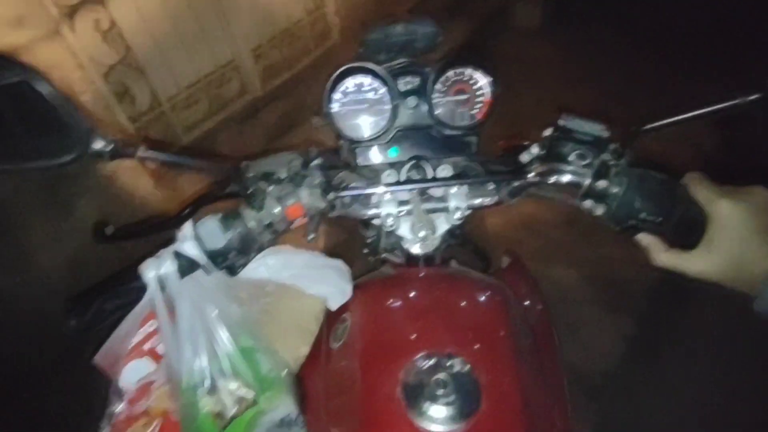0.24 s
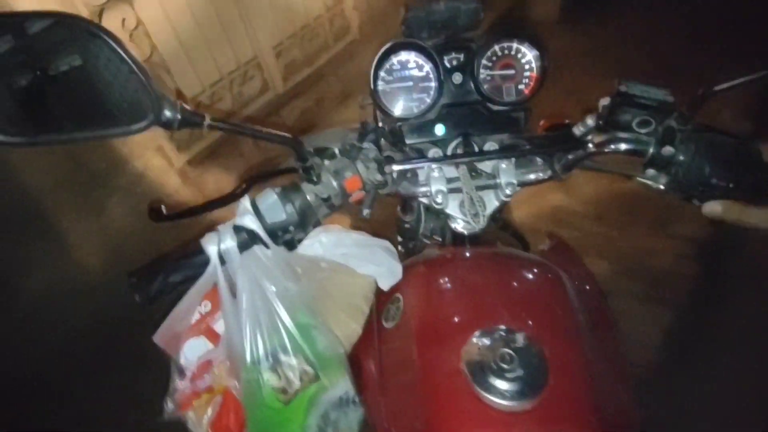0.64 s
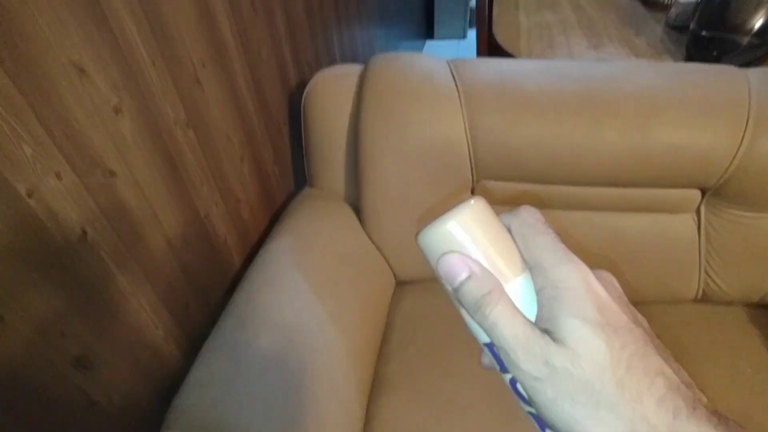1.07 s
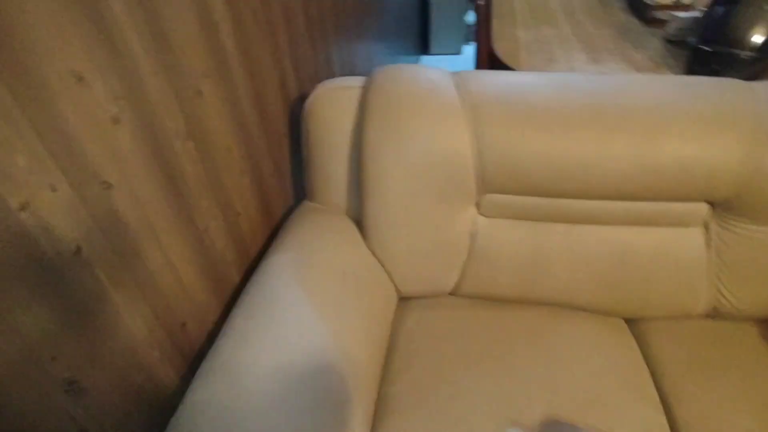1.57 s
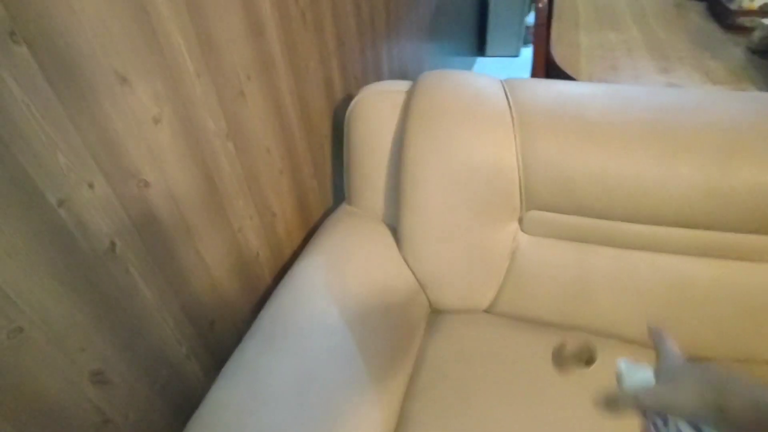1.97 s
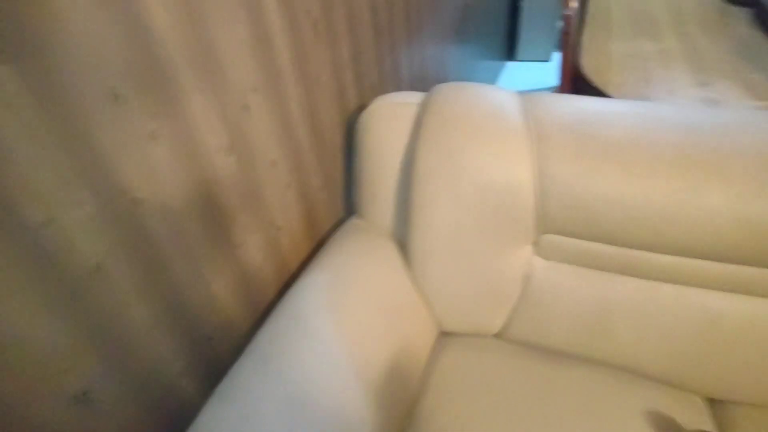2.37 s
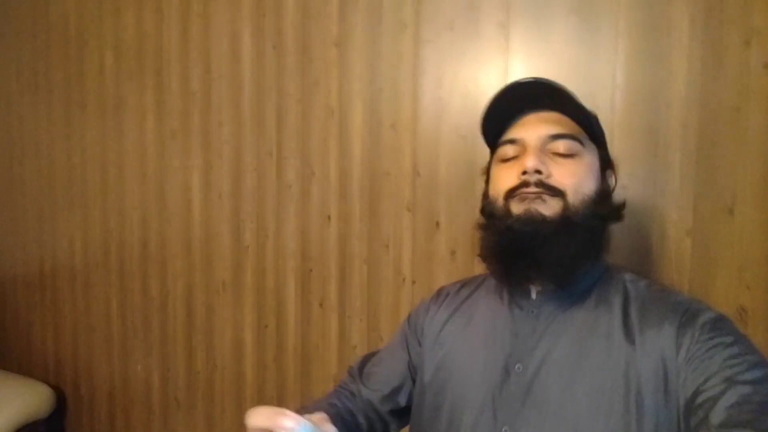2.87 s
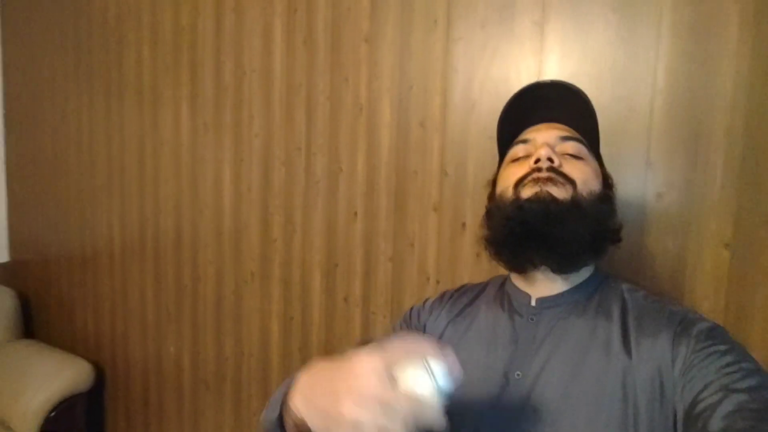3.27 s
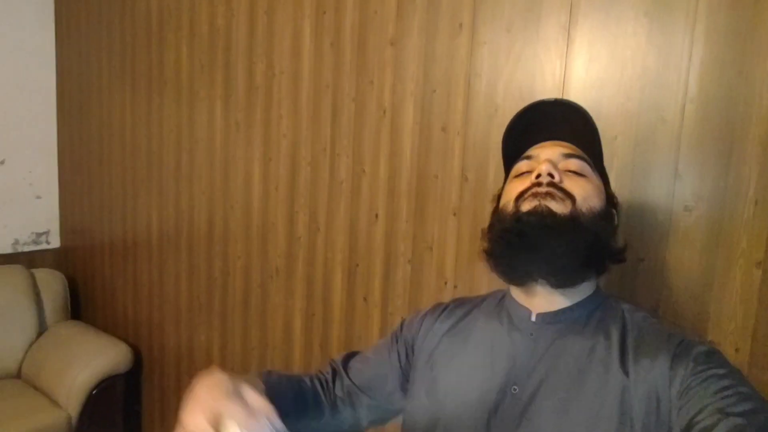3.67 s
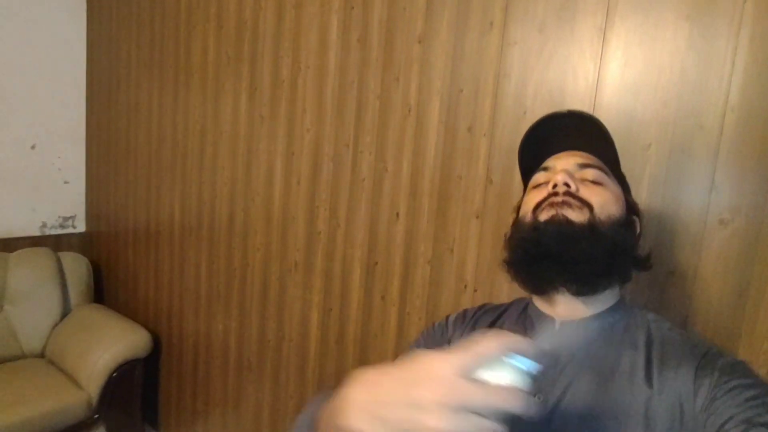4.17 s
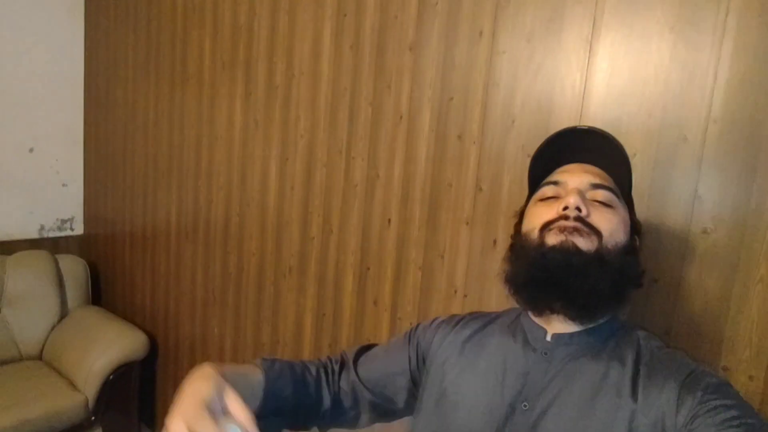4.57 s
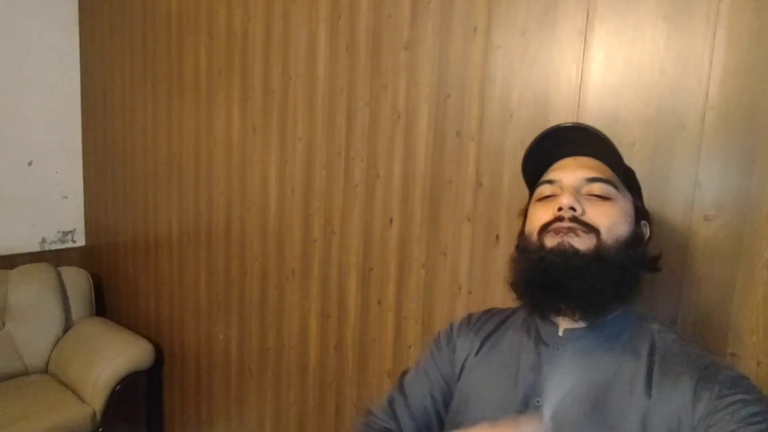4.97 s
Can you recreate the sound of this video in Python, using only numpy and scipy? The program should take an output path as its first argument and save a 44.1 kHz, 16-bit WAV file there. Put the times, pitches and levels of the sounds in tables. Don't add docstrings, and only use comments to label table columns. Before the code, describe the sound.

Stereo handheld microphone, three abrupt scenes. First, a loud, close motorcycle start: starter whine, gear clunk, heavy strokes, rapid rattling engine. Next, a hushed indoor room with low air noise, tiny cap handling sounds, one soft sofa thud and small plastic bounces. Last, a brief pause, then bright smooth aerosol noise at arm's length, wavering in level and direction as the hand swings.

```python
import sys
import numpy as np
from scipy import signal
from scipy.io import wavfile
from scipy.ndimage import uniform_filter1d, map_coordinates

SR = 44100
rng = np.random.default_rng(int(sys.argv[2]) if len(sys.argv) > 2 else 0)


def wav_out(sig):
    wavfile.write(sys.argv[1], SR, np.round(np.clip(np.atleast_2d(sig).T, -1, 1) * 32767).astype(np.int16))


def volts_from_decibels(level):
    exponent = np.asarray(level, float) / 20
    return 10 ** exponent


N = 231084


def rms_one(x):
    return x / np.sqrt(np.mean(x ** 2) + 1e-20)


def levelled(x, size, floor=1e-9):
    return x / np.sqrt(uniform_filter1d(x ** 2, size=size) + floor)


def span(t0, t1):
    return np.arange(int(t0 * SR), min(int(t1 * SR), N)) / SR


def in_time(rows, t):
    s, *columns = np.transpose(rows)
    return [np.interp(t, s, c) for c in columns]


def at_hz(points, hz):
    table_hz, values = np.transpose(points)
    return np.interp(np.log(hz), np.log(table_hz), values)


def butter(x, order, hz, kind="low"):
    return signal.sosfilt(signal.butter(order, hz, kind, fs=SR, output="sos"), x)


def tone(hz):
    return np.sin(2 * np.pi * np.cumsum(hz) / SR)


def slightly_right(x):
    return x * volts_from_decibels([[-.6], [.6]])


def drift(rate, size):
    r = np.exp(-80 * np.pi * rate / SR)
    slow = signal.lfilter([1], [1, -2 * r, r * r], rng.standard_normal(size // 40 + 1002))[1000:]
    return np.interp(np.arange(size) / 40, np.arange(len(slow)), rms_one(slow))


def swells(rows, t):
    power = 1e-14
    for s, db, attack, hold, t60 in rows:
        release_db = -60 * np.maximum(t - s - attack - hold, 0) / t60
        shape = np.clip((t - s) / attack, 0, 1) ** 2 * volts_from_decibels(db + release_db)
        power = power + shape ** 2
    return np.sqrt(power)


def resonate(x, peaks):
    out = 0
    for k, (hz, width, db) in enumerate(peaks):
        r = np.exp(-np.pi * width / SR)
        a = [1, -2 * r * np.cos(2 * np.pi * hz / SR), r * r]
        out = out + (-1) ** k * volts_from_decibels(db) * signal.lfilter([1 - r * r, 0, r * r - 1], a, x + 1e-18)
    return out


def strike(clicks, modes):
    out = 0
    for hz, db, t60 in modes:
        r = volts_from_decibels(-60 / (t60 * SR))
        w = 2 * np.pi * hz / SR
        a = [1, -2 * r * np.cos(w), r * r]
        out = out + volts_from_decibels(db) * signal.lfilter([0, np.sin(w)], a, clicks + 1e-18)
    return out


def blows(rows, modes, t):
    clicks = np.zeros(len(t))
    for k, (s, db) in enumerate(rows):
        clicks[int((s - t[0]) * SR)] = (-1) ** k * volts_from_decibels(db)
    return strike(clicks, modes)


def noise(size, spectrum, alike, balance=((1, 0),), patchy_db=1.0, lag=None):
    shared = rng.standard_normal((2, size))
    own = rng.standard_normal((2, 2, size))
    late = shared
    if lag is not None:
        late = [map_coordinates(row, [np.arange(size) - lag], mode="wrap") for row in shared]
    out, together = 0, drift(2.4, size)
    first_hz, last_hz = spectrum[0][0], spectrum[-1][0]
    edges = first_hz * 2 ** np.arange(0, np.log2(last_hz / first_hz) + 1 / 3, 1 / 3)
    for k, (low, high) in enumerate(zip(edges, edges[1:])):
        hz = np.sqrt(low * high)
        share = np.clip(at_hz(alike, hz), 0, 1)
        common = np.array([shared[k % 2], late[k % 2]])
        white = np.sqrt(share) * common + np.sqrt(1 - share) * own[k % 2]
        band = butter(white, 2, [low, min(high, .45 * SR)], "band")
        side_db = at_hz(balance, hz) / 2 * np.array([[1], [-1]])
        wander_db = patchy_db * (0.37 * together + drift(31, size))
        out = out + volts_from_decibels(at_hz(spectrum, hz) + side_db + wander_db) * band
    return rms_one(out)


# (frequency [Hz], level [dB per Hz])
SOFA_ROOM = [(25, -42), (55, 3), (90, -14), (160, -2.5), (250, 2.5), (340, -10.5), (500, -15.5), (900, -24),
             (1500, -31), (3300, -36.5), (15500, -70.5)]
# (frequency [Hz], level [dB per Hz])
PANEL_ROOM = [(25, -36), (60, -17), (100, -8), (160, -8.5), (250, -7.5), (400, -11.5), (900, -13.5),
              (1700, -25), (4000, -31), (15500, -49)]
# (frequency [Hz], width [Hz], level [dB])
ROOM_MODES = [(124, 6, 0), (202, 6, -1), (290, 30, -17), (926, 50, -30)]
# (frequency [Hz], likeness [0-1])
ROOM_ALIKE = [(60, -0.14), (180, 0.83), (550, -0.033), (1650, -0.3), (4970, 0.14), (15000, -1.2)]
# (time [s], level [dB], attack [s], hold [s], t60 [s])
AIR_SWELLS = [
    (1.04, -58, 0.038, 0.31, 1.6),
    (4.85, -62, 0.3, .3, 1.2),
]


def room(t, spectrum, level_db, hum_db):
    hum = rms_one(resonate(rng.standard_normal(len(t)), ROOM_MODES))
    air = noise(len(t), spectrum, ROOM_ALIKE, patchy_db=2.0)
    mic_hiss = butter(rng.standard_normal((2, len(t))), 1, 5000, "high")
    level = np.hypot(volts_from_decibels(level_db), swells(AIR_SWELLS, t))
    return level * (volts_from_decibels(hum_db) * hum + 0.7 * air) + volts_from_decibels(-82) * mic_hiss


# (start [s], end [s], from [Hz], to [Hz], level [dB])
SINGING = [(0, .145, 3680, 3640, -49), (0, 0.0734, 4100, 3550, -48), (0, 0.15, 2700, 3260, -47),
           (.055, 0.121, 2400, 2660, -42), (0, 0.138, 1685, 1725, -46.5), (.165, .215, 2740, 2500, -45),
           (.3, 0.344, 1100, 1200, -37.5), (.34, 0.44, 1265, 1100, -48), (.44, 0.98, 2270, 3900, -47.5),
           (0.088, 0.106, 430, 426, -39), (.3, .39, 540, 580, -41), (.24, .34, 78, 76, -31),
           (.37, .52, 76, 60, -32), (.75, 1.05, 1180, 1145, -40.5), (.86, 1.05, 890, 915, -38.5),
           (.28, .42, 800, 880, -42), (.215, .285, 300, 302, -24), (.49, .53, 370, 365, -26),
           (.9, 1.0, 1800, 1400, -44), (.225, .285, 180, 170, -28.5), (.285, 0.32, 200, 190, -37),
           (.195, .228, 1960, 1890, -36), (.185, .225, 900, 940, -38), (.245, .305, 2100, 1780, -41.5),
           (.245, .31, 2250, 2240, -41), (0.05, .125, 139, 132, -38.5), (1, 0.96, 205, 200, -35.5)]


def singing(t):
    out, fade_s, rough_db = 0, .015, 3.5
    for start, end, from_hz, to_hz, db in SINGING:
        hz = np.interp(t, [start, end], [from_hz, to_hz])
        edge = np.clip(np.minimum(t - start + .003, end - t) / fade_s, 0, 1)
        level_db = db + rough_db * drift(min(from_hz / 40, 50), len(t))
        out = out + np.sqrt(2) * volts_from_decibels(level_db) * edge * tone(hz)
    return out * volts_from_decibels([[-1.5], [1.5]])


# (time [s], peak level [dB])
KNOCKS = [(0.492, -26), (0.509, -21.5), (0.52, -21), (0.569, -25), (0.586, -21.5), (0.659, -20.5),
          (0.68, -20), (0.713, -16.5), (0.763, -22), (0.77, -17.5), (0.812, -17.5), (0.836, -22.5),
          (0.871, -17), (0.891, -22), (0.907, -23.5), (0.919, -22), (0.955, -22), (0.993, -27.5),
          (1.014, -19)]
# (frequency [Hz], level [dB], t60 [s])
KNOCK_MODES = [(800, -7, .02), (895, -3.5, 0.039), (1170, -1.5, 0.037), (1300, -7, .015), (2300, -9, .015)]


def knocks(t):
    rung = butter(volts_from_decibels(-2) * blows(KNOCKS, KNOCK_MODES, t), 2, 1800)
    return np.array([rung, np.roll(rung, 5)])


# (start [s], end [s], tooth rate from [Hz], to [Hz], level [dB])
MESH = [
    (0, .037, 1105, 1120, -32.5),
    (.04, .127, 1170, 1205, -39),
    (.128, .174, 1365, 1388, -42),
    (.175, .216, 1270, 930, -24.5),
    (.214, .232, 1095, 1130, -26),
    (.3, .47, 1270, 1410, -44),
]


def mesh(t):
    hz, gain = np.full(len(t), 1100.), np.zeros(len(t))
    for start, end, from_hz, to_hz, db in MESH:
        on = (t >= start) & (t < end)
        sags = to_hz < from_hz
        way = (t[on] - start) / (end - start)
        hz[on] = from_hz + (to_hz - from_hz) * way ** (1.5 if sags else 1)
        rise = (t[on] - start + 0.0024) / (3 if sags else 1)
        gain[on] = volts_from_decibels(db) * np.clip(np.minimum(rise, end - t[on]) / .007, 0, 1)
    return hz, gain


# (multiple, level [dB])
WHINE_ORDERS = [(1, -8), (2, 0), (3, -8)]


def whine(t):
    hz, gain = mesh(t)
    phase = 2 * np.pi * np.cumsum(hz * (1 + 0.011 * drift(90, len(t)))) / SR
    passed = {3: 1 / (1 + ((3 * hz - 3680) / 150) ** 4)}
    ports = np.zeros((2, len(t)))
    for port, turn in enumerate((0, -.4)):
        for k, db in WHINE_ORDERS:
            level = passed.get(k, 1) * volts_from_decibels(db + 2.2 * drift(45, len(t)))
            ports[port] += level * np.sin(k * (phase + turn))
    return gain * (1 + .3 * drift(150, len(t))) * ports


# (frequency [Hz], level [dB], t60 [s])
CLUNK_MODES = [(492, -1.5, 0.05), (545, -4.5, .04), (277, -11.5, 0.082), (1260, -8.5, 0.024),
               (1780, -7, 0.039), (2350, -3, 0.019), (2767, -1, 0.025), (5100, -15.5, 0.029)]


def clunk(t):
    clicks = np.zeros(len(t))
    contacts_s = .2295 + np.array([0, .005, .009])
    clicks[(SR * contacts_s).astype(int)] = volts_from_decibels(-9) * np.array([-.5, .8, -.5])
    rung = butter(strike(clicks, CLUNK_MODES), 2, 230, "high")
    return np.array([rung, volts_from_decibels(4.5) * np.roll(rung, 5)])


# (time [s], level [dB])
KICKS = [
    (0.255, -22),
    (.589, -17),
    (0.641, -12.5),
    (.692, -20.5),
    (0.793, -23),
]
# (frequency [Hz], level [dB], t60 [s])
KICK_MODES = [(131, 0, 0.1), (204, -3.5, 0.044)]


def kicks(t):
    clicks = np.zeros(len(t))
    for s, db in KICKS:
        clicks[int(s * SR)] = volts_from_decibels(db)
    return strike(clicks, KICK_MODES)


# (frequency [Hz], width [Hz], level [dB])
STARTER_SHELL = [(1660, 60, -11.5), (2550, 120, -4.5), (3270, 32, -8.5), (3530, 45, -3)]
# (time [s], level [dB], attack [s], hold [s], t60 [s])
STARTER_RUN = [
    (-.02, -44.5, 0.022, 0.14, .06),
    (.178, -39.5, 0.013, .015, .08),
]


def starter(t):
    shell = rms_one(resonate(rng.standard_normal((2, len(t))), STARTER_SHELL))
    return whine(t) + clunk(t) + kicks(t) + swells(STARTER_RUN, t) * shell


# (time [s], level [dB], attack [s], hold [s], t60 [s])
TANK = [
    (0.241, -31.5, 0.008, 0.1, .6),
    (0.651, -29, 0.008, .1, 2.8),
]
# (time [s], level [dB], attack [s], hold [s], t60 [s])
SIDE_PANEL = [
    (.17, -26, .02, 0.069, 0.091),
    (.42, -31.5, .03, 0.026, 0.23),
    (.62, -24.5, 0.033, 0.048, .4),
]


def panels(t):
    tank_hz = 426 + sum(14 * (t > s) * np.exp(-np.abs(t - s) / 0.031) for s, *_ in TANK)
    unsteady = volts_from_decibels(6.1 * np.clip(drift(25, len(t)), -1, 1))
    tank = swells(TANK, t) * unsteady * tone(tank_hz)
    side = swells(SIDE_PANEL, t) * tone(299 * (1 + 0.015 * drift(11, len(t))))
    return slightly_right(np.sqrt(2) * (tank + side))


# (frequency [Hz], width [Hz], level [dB])
EXHAUST = [(86.43, 43, 2), (109, 24, 5.5), (145, 60, -2.5), (210.7, 71, -4.5)]
# (frequency [Hz], width [Hz], level [dB])
CRANKING = [(60, 19, -2.5), (145, 30, 0), (202, 140, -6.5)]
# (multiple, level [dB], phase [turns])
RUNNING_ORDERS = [(2, -6.5, 0.1), (3, 2, 0.14), (4, 11, 0.021), (5, 1.5, 0.19), (6, -19, 0.63),
                  (7, -11, 0.38), (8, -4.5, 0.3)]


def exhaust(t, turns, pulses, load_db):
    rough = rms_one(resonate(0.071 * pulses + rng.standard_normal(len(t)), EXHAUST))
    orders = sum(volts_from_decibels(db) * np.cos(2 * np.pi * (k * turns + turn)) for k, db, turn in RUNNING_ORDERS)
    settled = 1.14 * np.clip((t - 0.783) / 0.028, 0, 1)
    cranking = rms_one(resonate(rng.standard_normal(len(t)), CRANKING))
    pipe = levelled(np.where(t < .24, cranking, rough + settled * orders), 4000)
    level = volts_from_decibels(load_db + 3 * (t > .5) * np.cos(2 * np.pi * (turns - 0.035)))
    walls = volts_from_decibels(-17.0) * rms_one(resonate(rng.standard_normal(len(t)), EXHAUST))
    return level * (slightly_right(pipe) + walls * [[1], [-1]])


# (frequency [Hz], width [Hz], level [dB])
COVERS = [(243.5, 12, -6.5), (298.3, 16, 3), (344.5, 29, -5), (494, 24, -10.5)]
# (time [s], level [dB], attack [s], hold [s], t60 [s])
JOLTS = [
    (.175, -32.5, 0.032, 0.025, .2),
    (.225, -23.5, 0.029, 0.0081, 0.64),
    (.43, -25, 0.013, 0.011, 0.57),
    (.49, -22.5, 0.016, 0.0088, 0.27),
    (.62, -24.5, 0.0049, 0.049, 1),
]


def covers(t, pulses, load_db, free_db):
    shaking = np.hypot(volts_from_decibels(free_db - 34.5 + 0.35 * (load_db + 27)), swells(JOLTS, t))
    ringing = levelled(resonate(0.027 * pulses + rng.standard_normal(len(t)), COVERS), 2500)
    walls = volts_from_decibels(-12.0) * rms_one(resonate(rng.standard_normal(len(t)), COVERS))
    return shaking * (slightly_right(ringing) + walls * [[1], [-1]])


# (frequency [Hz], width [Hz], level [dB])
GEAR_RINGS = [(651, 20, -3.5), (788, 16, 2), (827, 16, 2), (898, 30, 5.5), (1024, 39, 1.5), (1159, 38, 3.5),
              (1255, 39, 4), (1675, 20, -9), (1776, 16, -8), (2265, 44, -5), (2313, 18, -5.5),
              (2390, 600, -10.5), (3810, 260, -19.5)]
# (frequency [Hz], level [dB per Hz])
GEAR = [(290, -33.5), (500, -4), (694, -10.5), (900, -4), (1130, -5.5), (1490, -0.5), (5000, -26.5),
        (6500, -56), (11000, -120)]
# (frequency [Hz], likeness [0-1])
GEAR_ALIKE = [(400, 0.55), (1000, 0.59), (2500, 0.56), (5000, 0.78)]
# (frequency [Hz], left minus right [dB])
YARD_BALANCE = [(60, -0.5), (180, 5), (550, 0.5), (1650, -1.5), (4970, -8.5), (15000, -4.5)]
# (time [s], level [dB], attack [s], hold [s], t60 [s])
RATTLES = [
    (.655, -25, 0.015, 0.091, .3),
    (.82, -32.5, .01, 0.029, .2),
    (.89, -34.5, 0.017, 0.026, .2),
    (1.008, -29.5, 0.018, 0.012, .1),
]


def clatter(t, gate, load_db, intake_db, free_db):
    late = 14
    gear = volts_from_decibels(free_db - 30 + 0.15 * (load_db + 29.5) + 0.37 * (intake_db + 32.5))
    near, own = rng.standard_normal((2, len(t)))
    shaken = np.array([near, 0.61 * np.roll(near, late) + own]) * (1.0 + gate)
    rings = rms_one(resonate(shaken, GEAR_RINGS))
    grain = noise(len(t), GEAR, GEAR_ALIKE, YARD_BALANCE, patchy_db=1.0, lag=late) * (1.7 + gate)
    return 0.93 * np.hypot(0.78 * gear, swells(RATTLES, t)) * rings + 0.65 * gear * grain


# (frequency [Hz], level [dB per Hz])
INTAKE = [(3500, 6), (5400, -8), (7000, -2.5), (8600, 4), (11400, -6), (14200, -6), (16000, 1), (19000, -3)]
# (frequency [Hz], likeness [0-1])
INTAKE_ALIKE = [(4000, .2), (6500, .5), (8500, .85), (11000, .94), (15000, .95)]


def intake(t, gate, intake_db):
    hiss = noise(len(t), INTAKE, INTAKE_ALIKE, YARD_BALANCE, patchy_db=1.5) * (1.0 + 0.58 * gate)
    throat = butter(hiss, 2, 7000)
    loss_db = -28 * np.clip((t - .75) / .12, 0, 1)
    return volts_from_decibels(intake_db) * (hiss + throat * (volts_from_decibels(loss_db) - 1))


# (time [s], firings per second [1/s])
FIRING = [
    (0, 11),
    (.26, 7),
    (.5, 13),
    (.6, 17.5),
    (.67, 22),
    (.73, 29),
    (.8, 27.5),
    (.92, 28),
    (1.05, 23),
]
# (time [s], level [dB])
LOAD = [(0, -39), (.2, -42), (.24, -39), (.265, -24), (.34, -33), (.42, -31), (.48, -42.5), (.53, -23.5),
        (.58, -24.5), (.66, -20.5), (.72, -19.5), (.78, -22), (.83, -17), (.92, -18), (1.04, -24)]
# (time [s], level [dB])
AIR = [(0, -40.5), (.17, -42), (.2, -28.5), (.24, -30.5), (.28, -37.5), (.33, -46), (.46, -47.5),
       (.48, -39.5), (.514, -27), (.62, -31.5), (.75, -34.5), (.86, -41.5), (1.0, -42.5), (1.04, -41.5)]


def engine(t):
    (load_db,), (intake_db,) = in_time(LOAD, t), in_time(AIR, t)
    free_s = (MESH[2][0] + MESH[2][1]) / 2
    free_db = -6.5 * np.exp(-((t - free_s) / 0.018) ** 2)
    turns = np.cumsum(in_time(FIRING, t)[0]) / SR
    turns -= np.interp(.868, t, turns)
    fired = np.diff(np.floor(turns), prepend=0) == 1
    fired = fired * np.clip((t - .46) / .06, 0, 1)
    pulses = -rms_one(signal.lfilter([1], [1, -1.92, .9216], fired))
    gate = np.exp(-(turns % 1) * 4.6)
    body = exhaust(t, turns, pulses, load_db) + covers(t, pulses, load_db, free_db) + panels(t)
    return body + clatter(t, gate, load_db, intake_db, free_db) + intake(t, gate, intake_db)


# (time [s], level [dB], attack [s], hold [s], t60 [s])
RUB = [
    (1.4, -71, 0.047, 0.23, 0.36),
    (1.58, -65, 0.041, 0.029, 0.15),
    (1.7, -77, 0.028, .06, .3),
]
# (frequency [Hz], width [Hz], level [dB])
CAP_SHELL = [(1980, 220, 5), (2650, 300, -6), (3650, 350, -4)]
# (time [s], level [dB], attack [s], hold [s], t60 [s])
SQUEAK = [
    (1.125, -78, 0.011, 0.011, 0.083),
    (1.17, -80, .03, .02, .06),
]
# (time [s], frequency [Hz])
SQUEAK_HZ = [
    (1.12, 2950),
    (1.14, 3000),
    (1.16, 3250),
    (1.23, 3294),
]
# (time [s], level [dB])
NUDGES = [
    (1.505, -68),
    (1.648, -66),
    (1.672, -58),
    (1.684, -64),
]
# (frequency [Hz], level [dB], t60 [s])
CAN_MODES = [(503, -1, .08), (390, -6, 0.038)]


def uncapping(t):
    shell = rms_one(resonate(rng.standard_normal((2, len(t))), CAP_SHELL))
    rub = swells(RUB, t) * volts_from_decibels(drift(23, len(t))) * shell
    squeak = swells(SQUEAK, t) * tone(in_time(SQUEAK_HZ, t)[0])
    return rub + squeak + blows(NUDGES, CAN_MODES, t)


# (time [s], peak level [dB])
THUMPS = [(2.129, -30.5), (2.1383, -27.5), (2.160, -42), (2.166, -36), (2.175, -37), (2.190, -33.5),
          (2.200, -41), (2.229, -43), (2.252, -44), (2.308, -50), (2.315, -47), (2.326, -49),
          (2.340, -41.5), (2.361, -50), (2.388, -53), (2.461, -56), (2.469, -56), (2.501, -48.5),
          (2.509, -52), (2.522, -50), (2.531, -52)]
# (frequency [Hz], level [dB], t60 [s])
CUSHION_MODES = [(91.6, -12, 0.21), (118.5, 4.5, 0.12), (183, 6, 0.05), (272, -7.5, 0.034),
                 (380, -34, 0.013)]
# (time [s], level [dB], attack [s], hold [s], t60 [s])
SHUDDER = [
    (2.142, -33.5, 0.0059, 0.053, 0.1),
    (2.19, -42.5, 0.04, 0.12, 0.2),
    (2.44, -55, 0.014, 0.083, 0.29),
]
# (frequency [Hz], width [Hz], level [dB])
FRAME = [(66, 13, -18), (91, 29.6, -1.5), (125.5, 21.6, 1.5), (164, 54, -10), (228, 88, -14)]


def sofa(t):
    pushes = np.zeros(len(t))
    for s, db in THUMPS:
        pushes[int((s - t[0]) * SR)] = -volts_from_decibels(db)
    soft = signal.lfilter([.01], [1, -1.8, .81], pushes)
    frame = levelled(resonate(rng.standard_normal(len(t)), FRAME), 2000)
    return slightly_right(strike(soft, CUSHION_MODES) + swells(SHUDDER, t) * frame)


# (time [s], peak level [dB], tail t60 [s], bright edge [dB])
TICKS = [
    (1.871, -56, .1, -10),
    (2.1283, -42.5, 0.39, -25),
    (2.140, -58, 0.94, -10),
    (2.330, -55, 0.16, -13),
    (2.334, -51.5, .15, -14),
    (2.458, -61, 0.13, 0),
    (2.5003, -49, 0.13, -2),
    (2.5066, -47, 0.24, -9),
    (2.517, -65, .1, -10),
]
# (frequency [Hz], level [dB per Hz])
LEATHER = [(290, -6.5), (500, -6), (888, -8), (1990, -7), (3790, -11), (5830, -16), (6270, -14),
           (15500, -21.5)]
# (time [s], level [dB], attack [s], hold [s], t60 [s])
HANDLING = [
    (1.1, -72.5, 0.038, 0.04, 1.26),
    (1.47, -63.5, 0.14, 0.064, 0.23),
    (1.68, -72, .03, 0.4, 3.4),
    (2.14, -68.5, 0.19, 0.31, 1.36),
]
# (frequency [Hz], level [dB], t60 [s])
CAP_MODES = [(1140, -4, 0.0277), (2130, -16, .03), (3690, -5.5, 0.042), (5200, -4.5, 0.014)]
# (time [s], level [dB], attack [s], hold [s], t60 [s])
CAP_HUM = [
    (1.875, -77, .005, .015, .08),
    (2.332, -75, .005, .015, 0.16),
    (2.38, -86, .03, .1, .3),
    (2.53, -80, .02, .04, .2),
]
# (time [s], level [dB], attack [s], hold [s], t60 [s])
SCRAPE = [
    (2.51, -58, 0.011, 0.015, .25),
]
# (frequency [Hz], width [Hz], level [dB])
SLIDE = [(1490, 790, 2), (2130, 610, 4), (2900, 500, 0)]


def cap(t):
    tails = swells(HANDLING, t)
    ticks, taps, edges = np.zeros((3, len(t)))
    for s, db, t60, edge_db in TICKS:
        age, begun = np.maximum(t - s, 0), t >= s
        ticks += begun * volts_from_decibels(db - 60 * age / 0.02)
        edges += begun * volts_from_decibels(db + edge_db - 60 * age / 0.019)
        tails = tails + begun * 0.26 * volts_from_decibels(db - 60 * age / t60)
        taps[int((s - t[0]) * SR)] = volts_from_decibels(db - 2.5)
    grain = noise(len(t), LEATHER, ROOM_ALIKE, patchy_db=1.5)
    leather = ticks * grain + tails * butter(grain, 1, 3600)
    leather += edges * butter(rng.standard_normal((2, len(t))), 2, 2300, "high")
    scrape = swells(SCRAPE, t) * rms_one(resonate(rng.standard_normal((2, len(t))), SLIDE))
    hum = swells(CAP_HUM, t) * np.sin(2 * np.pi * 3530 * t)
    ring = strike(taps, CAP_MODES)
    return leather + scrape + hum + [ring, np.roll(ring, -8)]


# (time [s], lag of the right port [samples])
SWING = [(3.36, -2.5), (3.6, 1), (3.655, 7.8), (3.78, 6.6), (3.87, 1), (4.12, -4.2), (4.225, -4.7),
         (4.27, -6.3), (4.39, 0), (4.59, 8), (4.67, 8.9), (4.79, 5.5), (4.9, 2), (5.12, -3), (5.3, -3.5)]


def swing(t):
    s, lag = np.transpose(SWING)
    points = np.arange(len(s))
    way = np.interp(t, s, points)
    eased = np.floor(way) + np.sin(np.pi / 2 * (way % 1)) ** 2
    return np.interp(eased, points, lag)


# (time [s], jet level [dB], rise [s])
VALVE = [
    (3.205, -65, 0.017),
    (3.255, -57, 0.051),
    (3.412, -43.5, 0.029),
    (3.44, -43, 0.081),
]
# (time [s], loss [dB], fall [s], recovery [s])
FALTERS = [
    (3.635, 5.5, 0.063, 0.05),
    (3.851, 4.5, .07, 0.041),
    (4.0, 3, 0.047, 0.051),
    (4.599, 5, 0.016, 0.09),
    (4.82, 4, 0.16, 0.25),
    (5.25, 2, 0.051, .05),
]
# (frequency [Hz], level [dB per Hz])
JET = [(6000, -13.5), (7500, -9), (8500, -7), (10000, -2), (11500, -5.5), (13500, -7), (15000, -19.5),
       (16000, 1.5), (19000, 13.5)]
# (frequency [Hz], likeness [0-1])
JET_ALIKE = [(7000, .8), (9000, .9), (12000, .96), (15000, .97)]
# (frequency [Hz], left minus right [dB])
JET_BALANCE = [(7000, -10), (9000, -10.5), (12000, 0), (15000, -1)]
# (frequency [Hz], level [dB per Hz])
HISS = [(400, -17), (700, -5.5), (1200, -2), (2000, -1.5), (3000, -2), (4500, -3), (6000, -1.5),
        (7500, -1.5), (8500, -23)]
# (frequency [Hz], likeness [0-1])
HISS_ALIKE = [(400, .8), (1500, .75), (2500, .94), (4600, .95), (5700, .75), (7000, .55)]


def spray(t):
    lag = swing(t) + 0.75 * drift(25, len(t))
    opening = sum(volts_from_decibels(db) * np.clip((t - s) / rise, 0, 1) ** 2 for s, db, rise in VALVE)
    opening = opening * volts_from_decibels(1.6 * (t - t[0]))
    loss_db = 0
    for s, db, fall, back in FALTERS:
        loss_db = loss_db + db * np.exp(-((t - s) / np.where(t < s, fall, back)) ** 2)
    jet_db = 3.5 + 0.3 * lag - loss_db
    leaking = t < VALVE[2][0]
    hiss_db = 2.0 - 16.5 - 0.06 * lag - 0.94 * loss_db + 1.0 * leaking
    sides = np.array([[.5], [-.5]])
    jet_pan_db = -3.5 + 0.78 * lag
    hiss_pan_db = (-4 + 0.12 * lag) * (1 - 0.13 * np.clip(np.abs(lag) / 6, 0, 1))
    jet = butter(noise(len(t), JET, JET_ALIKE, JET_BALANCE, patchy_db=1.36), 8, 7700, "high")
    hiss = noise(len(t), HISS, HISS_ALIKE, patchy_db=1.5, lag=lag)
    return opening * (volts_from_decibels(jet_db + sides * jet_pan_db) * jet + volts_from_decibels(hiss_db + sides * hiss_pan_db) * hiss)


def add(out, t, sound):
    heard = butter(sound, 3, 53, "high")
    fade = np.clip(np.minimum(t - t[0] + .001, t[-1] - t) / .0012, 0, 1)
    start = round(t[0] * SR)
    out[:, start:start + len(t)] += fade * heard


def scene():
    out = np.zeros((2, N))
    yard_end_s, sofa_end_s, panel_start_s, spray_start_s = 1.0435, 2.606, 2.666, 3.2
    yard = span(0, yard_end_s)
    on_sofa = span(yard_end_s, sofa_end_s)
    panelled = span(panel_start_s, N / SR + 1)
    spraying = panelled[panelled > spray_start_s]
    add(out, yard, singing(yard) + knocks(yard) + starter(yard) + engine(yard))
    sofa_air = room(on_sofa, SOFA_ROOM, -63, hum_db=-3.5)
    add(out, on_sofa, sofa_air + uncapping(on_sofa) + sofa(on_sofa) + cap(on_sofa))
    rising_db = -67 + 1.36 * (panelled - panelled[0])
    add(out, panelled, room(panelled, PANEL_ROOM, rising_db, hum_db=2.0))
    add(out, spraying, spray(spraying))
    return out + volts_from_decibels(-112) * signal.lfilter([1], [1, -.98], rng.standard_normal(N))


def low_pass(x):
    return signal.sosfilt(signal.butter(12, 16320, fs=SR, output="sos"), x)


def record(dry):
    ceiling = .72
    rounded = dry / (1 + (np.abs(dry) / ceiling) ** 4) ** .25
    finished = signal.sosfilt(signal.ellip(16, .5, 85, 15820, fs=SR, output="sos"), rounded)
    return low_pass(finished)


dry = scene()
out = record(dry)
wav_out(out)
```